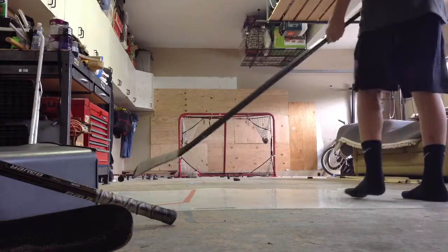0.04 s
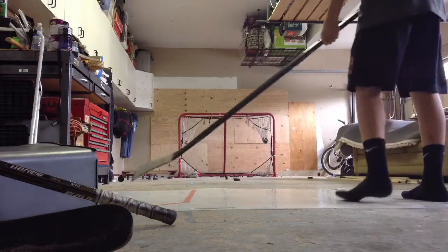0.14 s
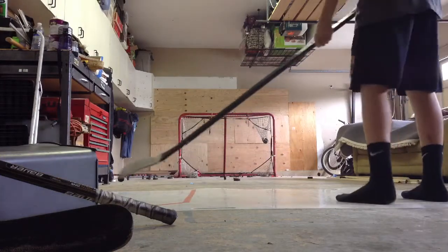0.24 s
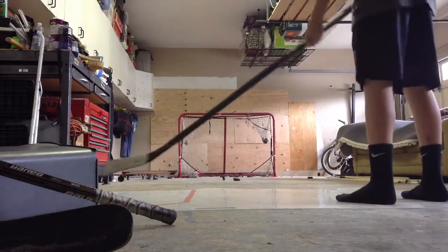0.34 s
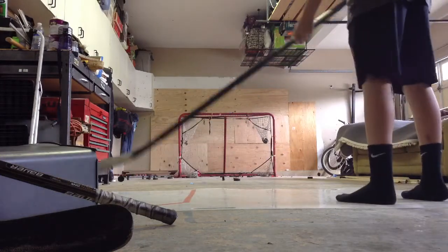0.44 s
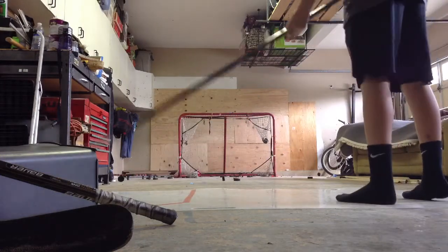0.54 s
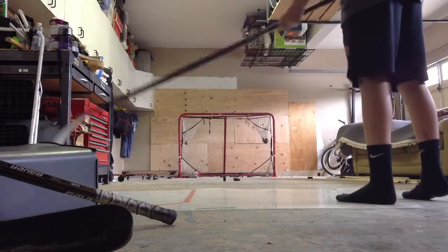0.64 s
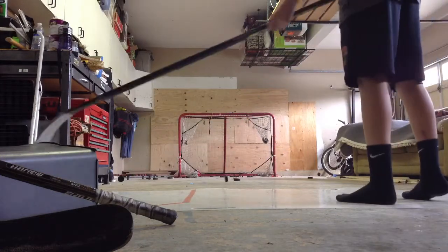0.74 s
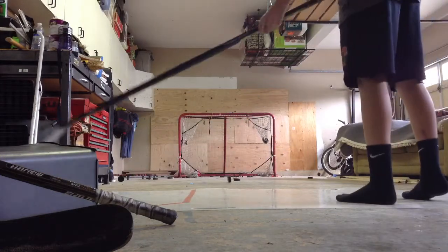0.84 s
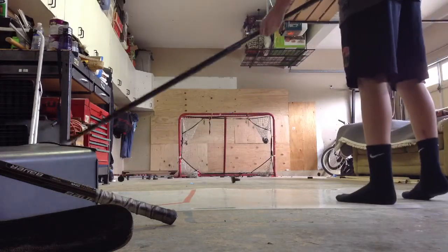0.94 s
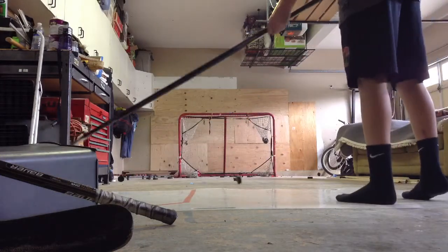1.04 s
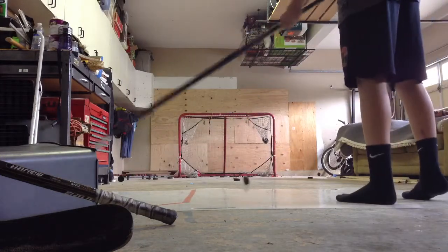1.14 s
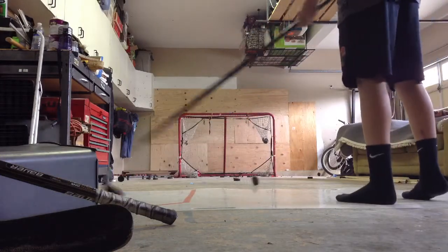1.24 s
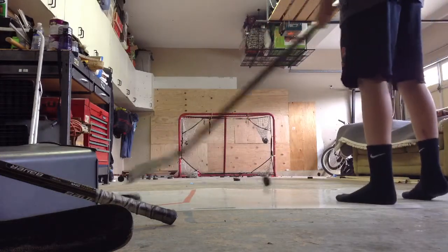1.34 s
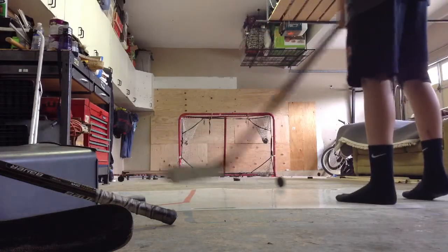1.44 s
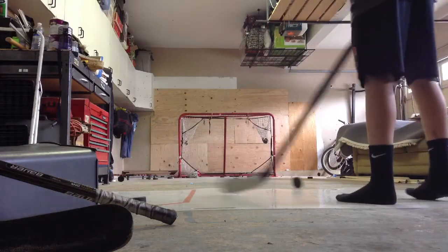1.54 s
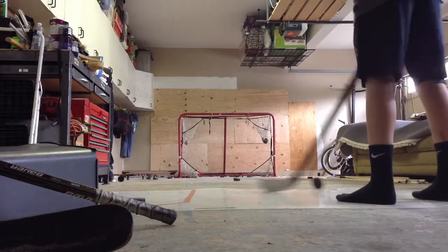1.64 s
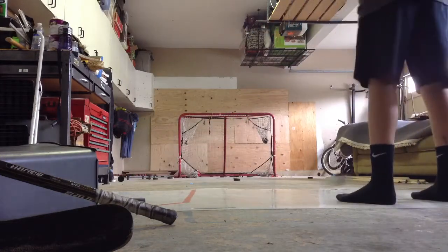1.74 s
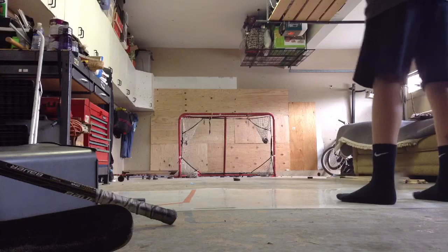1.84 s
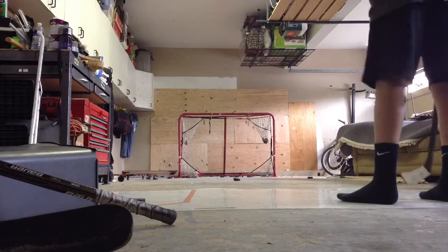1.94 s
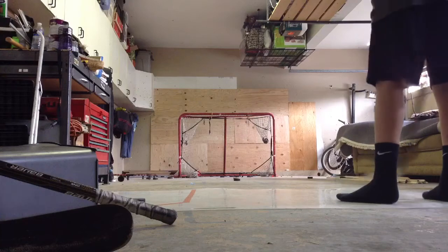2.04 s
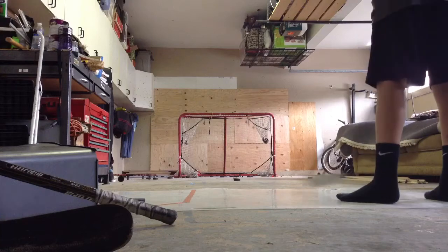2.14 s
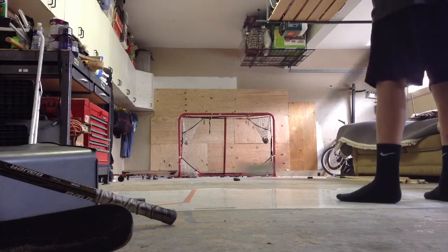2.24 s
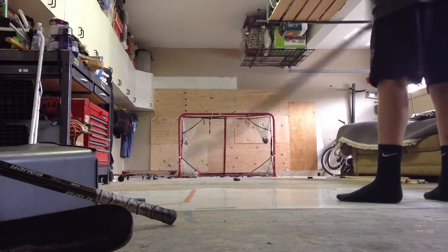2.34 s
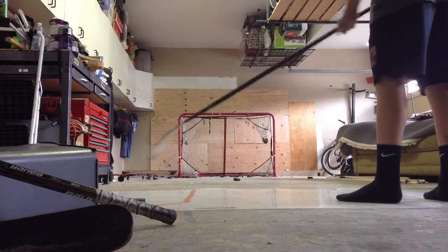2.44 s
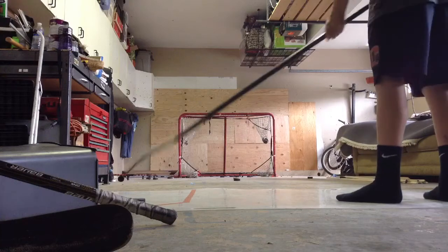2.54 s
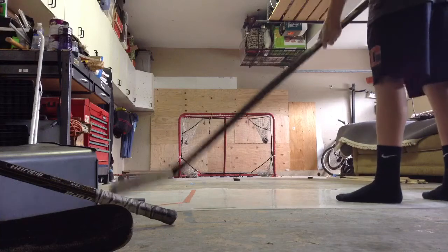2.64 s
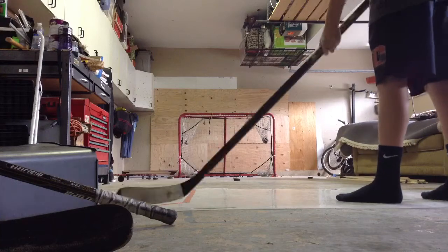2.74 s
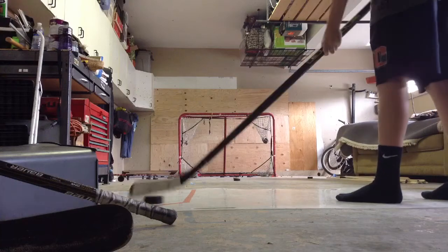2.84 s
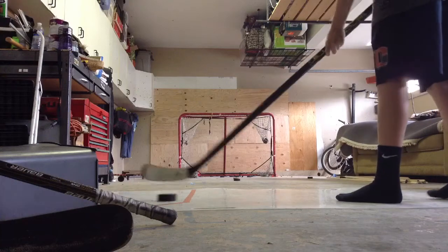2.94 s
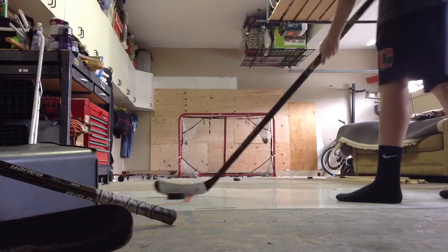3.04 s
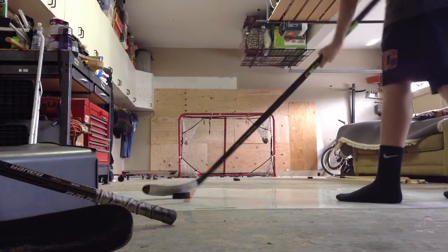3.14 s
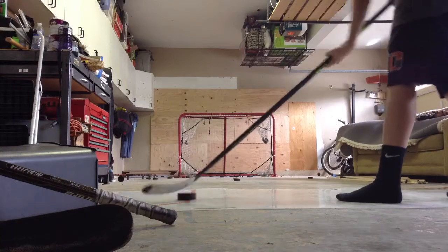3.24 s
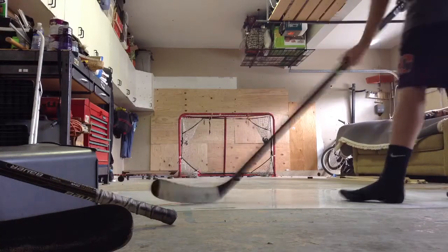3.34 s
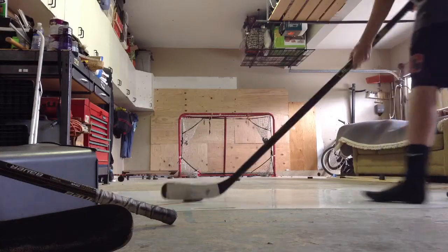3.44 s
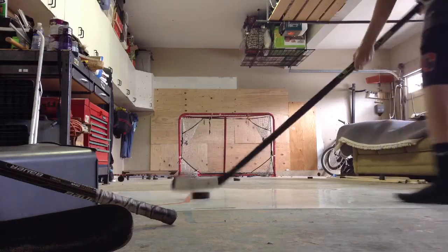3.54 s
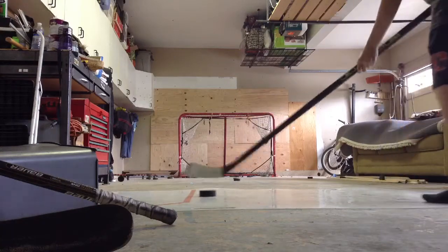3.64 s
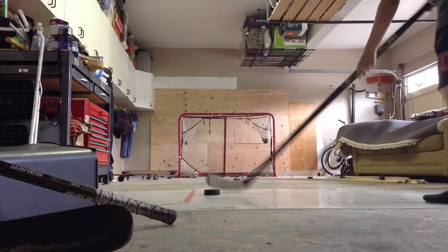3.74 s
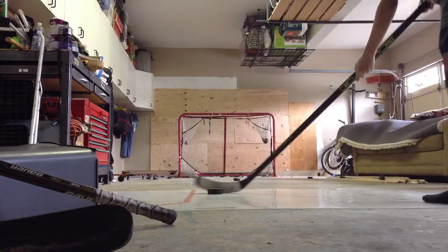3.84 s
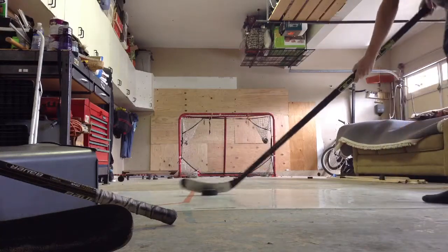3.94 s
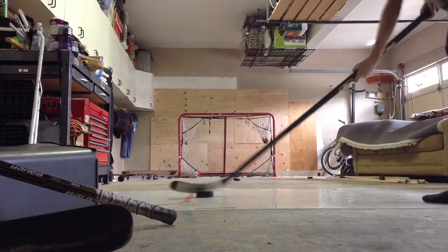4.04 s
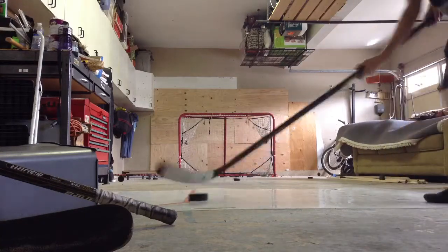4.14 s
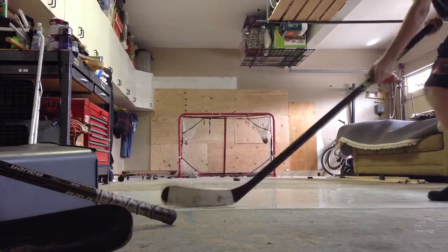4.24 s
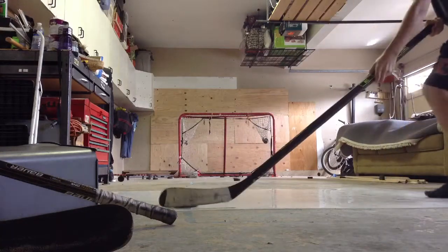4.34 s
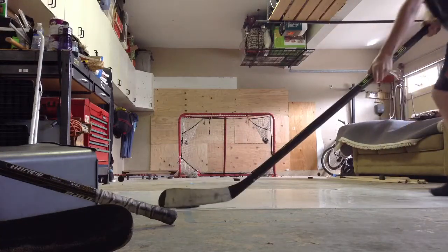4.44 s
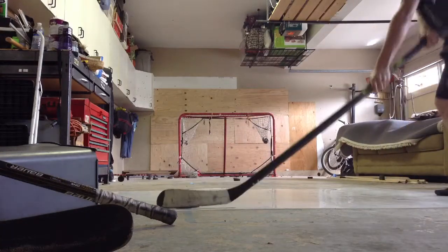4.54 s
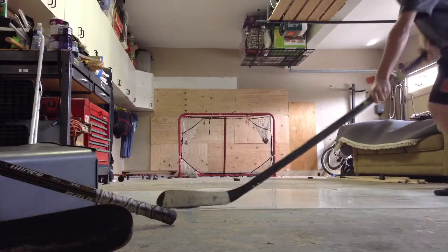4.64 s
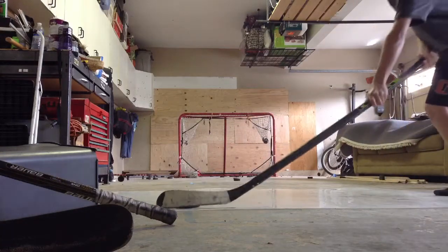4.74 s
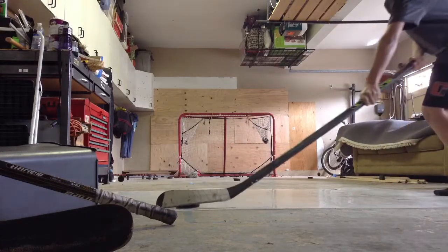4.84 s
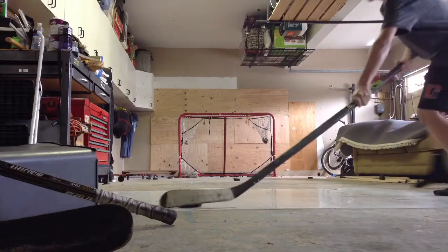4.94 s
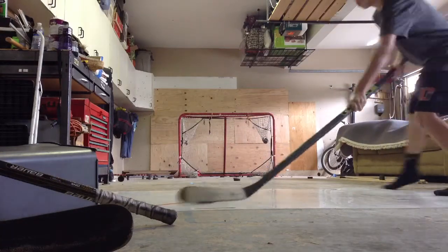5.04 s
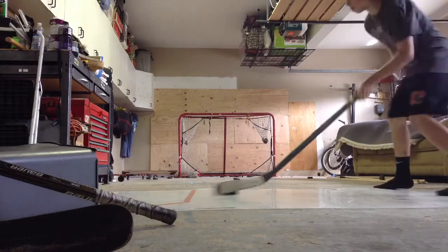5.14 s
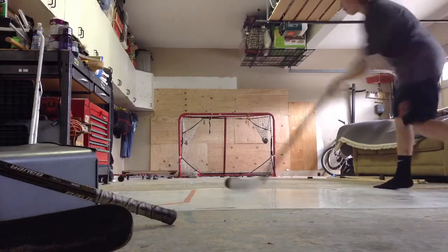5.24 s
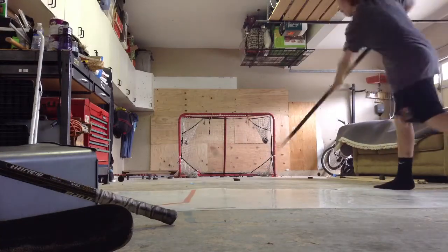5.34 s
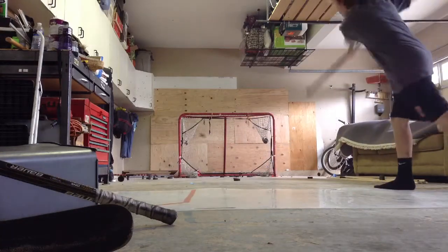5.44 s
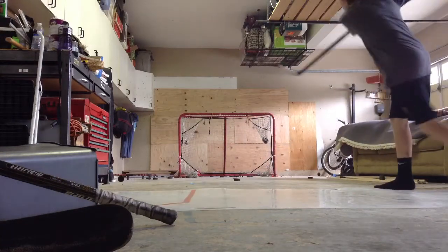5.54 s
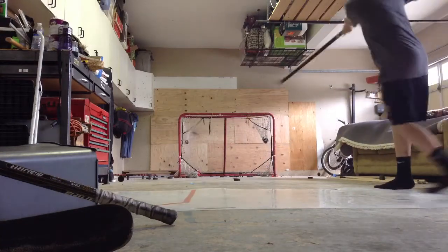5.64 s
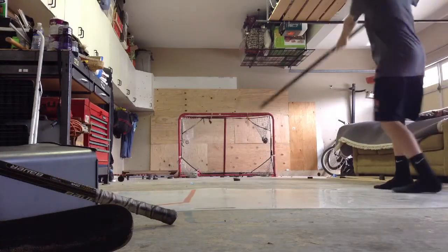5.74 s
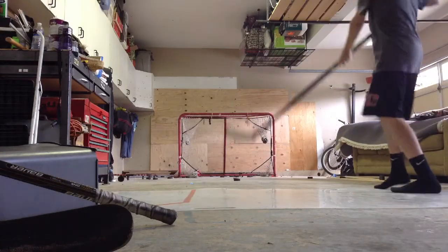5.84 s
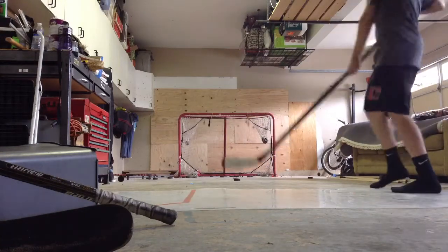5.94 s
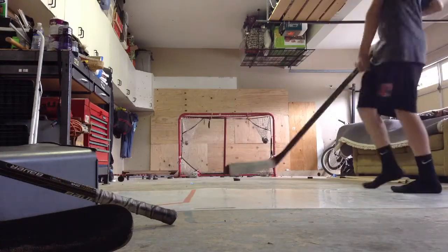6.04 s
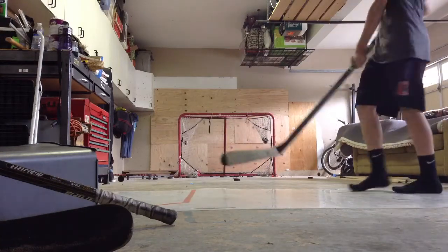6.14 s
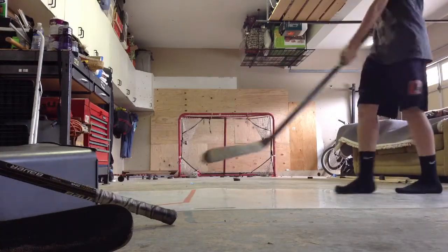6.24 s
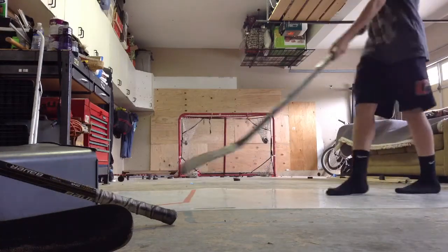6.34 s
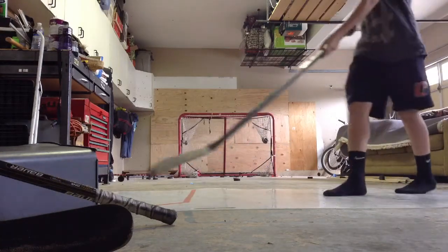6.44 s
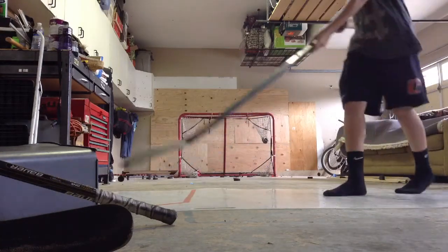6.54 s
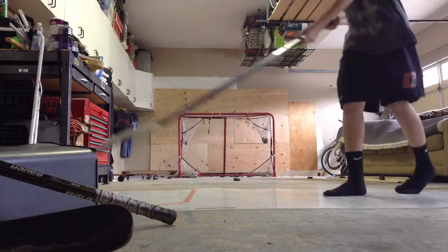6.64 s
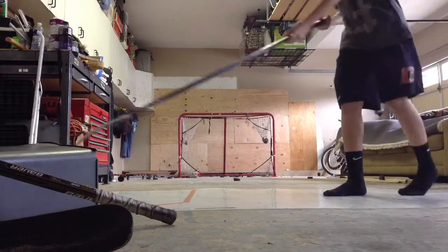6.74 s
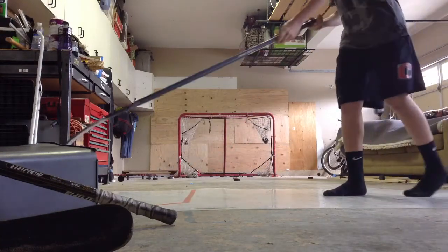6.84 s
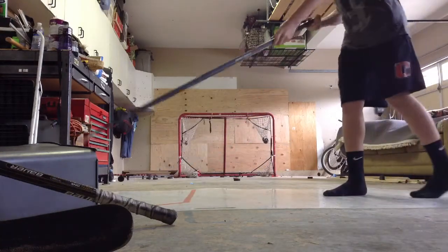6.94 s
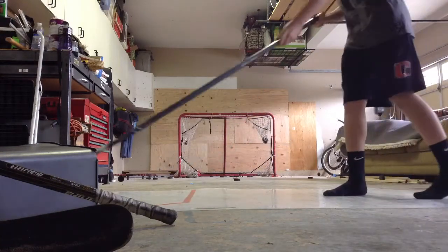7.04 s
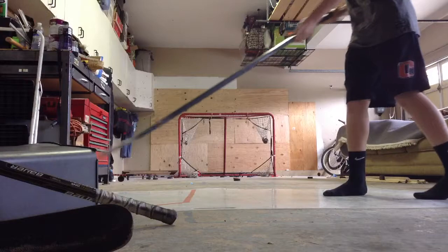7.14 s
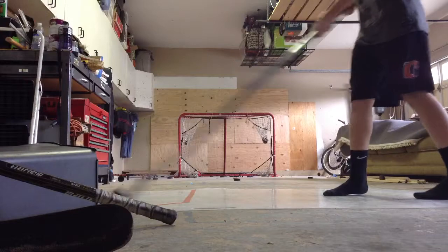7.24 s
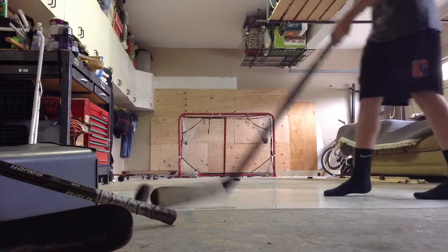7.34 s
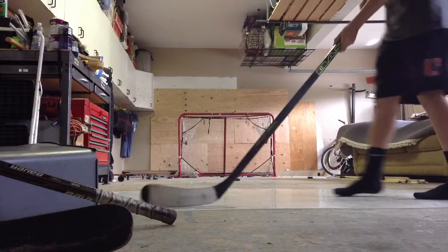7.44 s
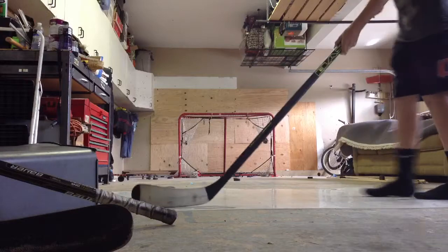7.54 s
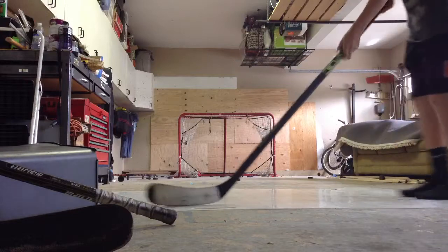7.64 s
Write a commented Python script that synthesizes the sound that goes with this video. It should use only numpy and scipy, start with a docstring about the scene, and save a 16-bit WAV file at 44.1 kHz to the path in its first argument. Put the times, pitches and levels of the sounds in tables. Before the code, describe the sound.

Hockey practice on a plastic pad indoors: light knocks and soft slides, a rapid run of clacks, a board knock and a slight steel ring. Heavy stick blows then come irregularly, slightly overloading the nearby bass-poor microphone, with scraping and floor slaps. After a pause comes a louder swish, a crackling flurry against hollow boards, a tiny tinkle, scattered taps and a last fast series, all in a lively garage with faint motor hum.

```python
"""Pucks and a stick blade on a plastic pad in a garage: faint knocks and slides, then quick clacks, a knock on
the plywood boards and a faint ring of the steel goal frame. The hardest blows follow, with scrapes and floor
thuds; then a louder slide, a dense flurry with hollow board knocks, a thin tinkle and a last run of clacks.
Each blow is a short push, the ring of the blade and a noisy crack; slides are shaped grit noise. The hard
room answers with echoes and a tail, over quiet air noise and a wavering motor hum."""
import sys
import numpy as np
from scipy import signal
from scipy.fft import rfft, irfft
from scipy.io import wavfile
from scipy.ndimage import uniform_filter1d

SR = 44100
rng = np.random.default_rng(int(sys.argv[2]) if len(sys.argv) > 2 else 0)


def ratio(d):
    """dB to gain"""
    e = np.asarray(d, float) / 20
    return 10 ** e


def file_out(sig):
    """Save sig as 16-bit WAV at sys.argv[1]."""
    # one column per channel
    cols = np.atleast_2d(sig).T
    # limit, then scale
    lim = np.clip(cols, -1, 1)
    pcm = np.round(lim * 32767).astype(np.int16)
    wavfile.write(sys.argv[1], SR, pcm)


N = 339570  # length of the scene in samples


def evened(x):
    """Scales a signal to rms 1."""
    return x / np.sqrt(np.mean(x ** 2) + 1e-20)


def read(points, hz):
    """Reads a curve of (hz, value) points along a logarithmic frequency axis."""
    point_hz, value = np.transpose(points)
    return np.interp(np.log(hz + 1), np.log(point_hz + 1), value)


def add(mix, s, sound):
    """Adds a sound to the mix in place from second s, cut at the end of the mix."""
    part = mix[round(s * SR):][:len(sound)]
    part += sound[:len(part)]


def coloured(x, spectrum):
    """Gives a long signal a spectrum of (hz, db) points, at rms 1."""
    gain = ratio(read(spectrum, np.fft.rfftfreq(len(x), 1 / SR)))
    return evened(irfft(rfft(x) * gain, len(x)))


def ring(t, hz, t60):
    """One dying mode: a sine that loses 60 dB in t60 seconds."""
    return np.sin(2 * np.pi * hz * t) * ratio(-60 * t / t60)


def blow(hz, crack_db, noise, detune):
    """Body (a one-cycle push and the blade's modes), crack of the edges, and its bright scatter."""
    # modes of stick blade and pad: mode_hz, width_hz, level_db
    blade_modes = [(434, 34, 0.5), (840, 150, -1.5), (1160, 350, 14), (1526, 28, 0), (2017, 47, 2),
                   (2330, 350, 13.5), (3050, 33, 1.5), (5100, 49, -14.5), (5800, 65, -27.5),
                   (7470, 84, -32)]
    t = np.arange(len(noise)) / SR

    late = np.maximum(t - .0011, 0)  # the body answers just after first contact
    push = ring(late, hz, 1.3 / hz) + 0.085 * ring(late, hz, 0.016)
    modes = np.zeros(len(t))
    for (mode_hz, width_hz, level_db), d in zip(blade_modes, detune):
        nearness_db = -7.0 * abs(np.log2(mode_hz / hz))  # the push excites modes near its own pitch
        t60 = min(1.53 / width_hz, .025)
        modes += ratio(level_db + nearness_db) * ring(late, mode_hz * (1 + 0.099 * d), t60)
    no_bass = signal.butter(3, 0.41 * hz, "high", fs=SR)  # a small body moves no air in the bass
    body = signal.lfilter(*no_bass, push + 0.19 * modes)
    top_hz = min(hz * (1.6 + 7.1 * ratio(crack_db)), 12000)  # a blow with less crack sounds duller
    body = signal.lfilter(*signal.butter(4, top_hz, fs=SR), body)

    contact = np.maximum(t - .0005, 0)
    burst = noise * (contact > 0) * ratio(-60 * contact / 0.016)
    crack = signal.lfilter(*signal.butter(1, [3200, 8000], "band", fs=SR), burst)

    click = (t == 0) + .03 * noise * ratio(-60 * t / .08)
    scatter = 3.86 * signal.lfilter(*signal.butter(1, [2700, 7800], "band", fs=SR), click)
    return body / abs(body).max(), crack / abs(crack).max(), scatter


def blows():
    """Direct sound of every blow of puck and blade, and their feeds to three room tails in turn."""
    # blows: contact_s, body_peak_db, push_pitch_hz, crack_db (hardness, against the body),
    # room_db (the body's feed to the room, against the direct body)
    blow_list = [(0.0764, -37, 1230, -9, -19), (0.1779, -42.5, 1740, -1, -5.5), (0.8661, -18, 930, -22, -8),
                 (0.901, -29, 920, -20, -15), (1.2544, -12, 1900, -6, 1), (1.2661, -11.5, 1900, -9, -11),
                 (1.285, -21, 2100, -19, -15), (1.311, -20, 2200, -4, -9), (1.3541, -10, 1660, -9.5, -4.5),
                 (1.369, -16.5, 2120, -14, -6), (1.5588, -22.5, 830, -5.5, -4.5),
                 (1.6529, -33.5, 1530, -5, 5), (1.7535, -9.5, 1200, -1, 4), (1.763, -3, 1250, -10.5, -2.5),
                 (2.3351, -30.5, 910, 2, 3.5), (2.585, -27.5, 493, -17.5, -7), (2.6708, -6, 1330, -2.5, -5),
                 (2.6831, -10, 1680, -12, -11.5), (3.0269, -3, 1240, -11.5, -6),
                 (3.106, -3.5, 950, -12.5, -10), (3.3276, -2.5, 1060, -7.5, -3),
                 (3.4269, -0.5, 840, -26, -13.5), (3.4696, -9.5, 1020, -15.5, -4.5),
                 (3.749, -7, 1600, -7.5, 0.5), (3.761, -1.5, 1720, -17, -27), (3.8561, 0, 864, -36, -9.5),
                 (4.1856, 2.5, 1466, -14, -6), (4.2812, -2.5, 1020, -26, -14.5), (5.067, -29, 2170, 7, -22),
                 (5.1451, -17, 750, -7, -2), (5.1554, -13.5, 826, -12.5, -26.5),
                 (5.1943, -12.5, 940, 5.5, 8.5), (5.2082, -20.5, 1160, 8, 8), (5.222, -13, 990, 5, -3),
                 (5.232, -5.5, 1090, -12, 2), (5.2515, -10, 1050, 5, 2), (5.6427, -18.5, 800, -7.5, 2),
                 (5.686, -14.5, 875, -9.5, -2.5), (5.8342, -16, 670, -5.5, 2),
                 (5.842, -14.5, 910, -3, -1.5), (6.0891, -11, 1070, -5.5, 3),
                 (6.094, -16.5, 1120, 3.5, 1.5), (6.5911, -45.5, 650, -7, 3),
                 (6.9206, -30, 696, -15.5, -0.5), (6.9441, -32, 750, -7, -15), (7.0306, -36, 655, -6.5, -2),
                 (7.1459, -12.5, 1800, -9, -0.5), (7.1586, -12, 1640, -11, -30),
                 (7.1933, -8.5, 1130, -7, -3.5), (7.209, -11, 1150, -14, -4),
                 (7.255, -11.5, 1410, -1.5, -4.5), (7.269, -17, 2200, -18, -2), (7.286, -21, 2300, -25, -8),
                 (7.4748, -14.5, 600, -20, -11.5), (7.5192, -32, 764, -31.5, -30),
                 (7.5658, -15, 1260, -3, -3.5), (7.646, -18, 2600, -17, -6)]
    scatter_db = -2  # a harder blow throws more brightness at the walls: its scatter follows its crack
    near, feeds = np.zeros(N), np.zeros((3, N))
    noise = rng.standard_normal((len(blow_list), 3000))
    detune = rng.standard_normal((len(blow_list), 40))
    for k, (s, db, hz, crack_db, room_db) in enumerate(blow_list):
        body, crack, scatter = blow(hz, crack_db, noise[k], detune[k])
        add(near, s, ratio(db) * (body + ratio(crack_db) * crack))
        to_room = ratio(room_db) * body + ratio(crack_db + scatter_db) * scatter
        add(feeds[k % 3], s, ratio(db) * to_room)
    return near, feeds


def thuds():
    """The pad slaps the floor: low tones that die within a few cycles, direct and as room feeds."""
    # slaps: contact_s, level_db, pitch_hz
    slap_list = [(0.866, -28, 330), (1.253, -25, 333), (2.586, -26, 316), (2.67, -28.5, 323),
                 (3.026, -21, 417), (3.107, -20.5, 304), (3.332, -22, 297), (3.428, -24, 356),
                 (3.622, -21, 400), (3.644, -20.5, 220), (3.663, -25.5, 253), (3.69, -28.5, 234),
                 (3.856, -23, 420), (4.186, -19.5, 387), (4.282, -23, 327), (5.645, -18, 331),
                 (5.833, -18, 430), (6.089, -17.5, 375), (6.592, -43, 382), (6.921, -30, 342),
                 (7.143, -22, 423), (7.473, -47, 415), (7.567, -22.5, 338)]
    near, feeds = np.zeros(N), np.zeros((3, N))
    t = np.arange(3000) / SR
    for k, (s, db, hz) in enumerate(slap_list):
        thud = ratio(db) * ring(t, hz, 7 / hz)
        add(near, s + 0.0022, thud)  # the direct thud comes just after contact
        add(feeds[k % 3], s, ratio(-6.0) * thud)
    return near, feeds


def slides():
    """Dense grit under puck and blade: a bright fizz and a duller rub swell and fade with each stroke."""
    # strokes over the pad: fastest_s, rise_s, fall_s, level_db, rub_db (against the stroke's level)
    strokes = [(0.18, 0.079, 0.046, -55, -13), (0.45, 0.15, 0.16, -70.5, -1), (1.12, 0.29, 0.13, -61.5, -2),
               (1.35, 0.077, 0.19, -48, 4), (1.6, 0.046, 0.12, -46, -12), (1.9, 0.26, 0.37, -55.5, -5),
               (2.2, 0.22, 0.31, -62, -15), (2.43, 0.16, 0.22, -54.5, -0.5), (2.85, 0.21, .4, -44, -2),
               (3.099, 0.18, 0.23, -44, 3), (3.42, 0.12, .15, -44, -15.5), (3.6, 0.26, 0.35, -43.5, -7.5),
               (3.98, 0.22, 0.28, -40, -13), (4.26, 0.11, 0.17, -44.5, 5), (4.52, 0.33, 0.19, -57.5, -17),
               (5.08, .2, 0.32, -36.5, -6), (5.502, .05, .1, -52.5, 5.5), (5.64, .1, 0.2, -39.5, -3),
               (5.9, .15, 0.14, -46.5, 2.5), (6.15, 0.14, 0.31, -44.5, -9), (6.78, 0.27, .35, -52.5, -12),
               (7.3, 0.14, 0.23, -49.5, -9.5), (7.56, 0.072, 1, -52, 5.5)]
    # spectrum of the bright fizz: freq_hz, density_db (per Hz, relative)
    fizz_spectrum = [(1470, -60), (2500, -2.5), (2930, -13), (3550, -2), (7710, -4.5), (8700, -5),
                     (13500, -1.5), (15400, -1)]
    # spectrum of the duller rub: freq_hz, density_db (per Hz, relative)
    rub_spectrum = [(88, -74), (150, -33), (271, -1.5), (584, -6), (895, -3.5), (1410, -0.5), (2100, 2.5),
                    (4000, -2), (5200, -15.5), (8800, -120)]
    ends_db = -20  # drop at one rise before and one fall after the fastest moment

    t = np.arange(0, N + 64, 64) / SR  # coarse time grid for the levels
    s, rise, fall, db, rub_db = np.transpose(strokes)[:, :, None]
    arch = ratio(db + ends_db * ((t - s) / np.where(t < s, rise, fall)) ** 2)

    def level(gains):
        """Sums the strokes by power and draws the level out to every sample."""
        return np.interp(np.arange(N) / SR, t, np.sqrt((gains ** 2).sum(0)))

    grit = rng.standard_normal((2, N)) * ratio(1.1 * rng.exponential(1, (2, N)))
    catches = ratio(1.2 * evened(uniform_filter1d(rng.standard_normal(N), 900)))  # uneven grip, in dB
    fizz = level(arch) * ratio(3.0) * coloured(grit[0], fizz_spectrum)
    rub = level(arch * ratio(rub_db)) * coloured(grit[1], rub_spectrum)
    return catches * (fizz + rub)


def boards():
    """Hollow knock of the plywood; each hit lands on another spot and stirs the modes unevenly."""
    # modes of the plywood behind the net: mode_hz, level_db, t60_s (cut short below)
    wood_modes = [(415, -31.5, 0.29), (597.4, -3, 0.13), (670, -8, 0.45), (736, -6.5, 0.73),
                  (840, -13, 0.61), (950, -31, 1.2), (996, -16, 0.39)]
    # hits on the plywood: start_s, level_db
    wood_hits = [(.867, -42), (1.763, -17.5), (5.146, -33.5), (5.196, -16), (5.228, -19.5), (5.252, -22.5),
                 (5.644, -31.5), (6.092, -32.5), (7.476, -30)]
    t, out = np.arange(SR // 4) / SR, np.zeros(N)
    spots = rng.standard_normal((len(wood_hits), len(wood_modes)))
    for (s, hit_db), spot in zip(wood_hits, spots):
        knock = np.zeros(len(t))
        for (hz, db, t60), d in zip(wood_modes, spot):
            knock += ratio(db + 5.6 * d) * ring(t, hz, min(t60, .09))
        add(out, s, ratio(hit_db) * knock)
    return out


def goal_frame():
    """A puck touches the steel pipe, whose modes ring."""
    # modes of the steel goal frame: mode_hz, level_db, t60_s
    pipe_modes = [(478, -4.5, 0.15), (969, -6, 0.24), (998, -11.5, 0.46), (1080, -5.5, 0.13),
                  (1722, -11, 0.15), (2800, -16, 0.22)]
    # touches of the pipe: start_s, level_db
    pipe_hits = [(2.339, -33)]
    t, out = np.arange(SR // 2) / SR, np.zeros(N)
    for s, hit_db in pipe_hits:
        add(out, s, ratio(hit_db) * sum(ratio(db) * ring(t, hz, t60) for hz, db, t60 in pipe_modes))
    return out


def tinkle():
    """Something small tinkles: thin brief tones with a soft onset."""
    # tones: start_s, pitch_hz, level_db, t60_s
    tones = [(5.701, 5370, -47, .4), (5.73, 10050, -37, 0.15)]
    t, out = np.arange(SR // 2) / SR, np.zeros(N)
    for s, hz, db, t60 in tones:
        add(out, s, ratio(db) * ring(t, hz, t60) * (1 - np.exp(-t / 0.011)))
    return out


def garage(feeds):
    """A few early echoes, then sparse taps whose bands die at their own speed."""
    # decay of the garage: freq_hz, t60_s
    decay = [(150, 0.47), (400, 0.66), (1000, 0.62), (2800, 0.75), (7000, 0.73), (14000, 0.23)]
    # early echoes from floor, shelves, ceiling: delay_s (before a small random shift), level_db
    early = [(.0045, -4), (0.01, -7), (0.0149, -6), (.023, -23), (0.03, -19.5)]
    t = np.arange(SR) / SR

    taps = np.zeros((3, SR))
    slots = np.arange(300, SR - 12, 12)  # one tap of random sign in every 12 samples
    at = slots + rng.integers(0, 12, (3, len(slots)))
    np.put_along_axis(taps, at, rng.choice([-1., 1.], at.shape), 1)
    taps *= 1 - np.exp(-t / 0.0034)  # the tail builds up
    # shelves and walls return clusters, which even out later in the tail
    lumps = evened(uniform_filter1d(rng.standard_normal((3, SR)), 260, axis=1))
    taps *= ratio(3.15 * lumps * np.exp(-t / 0.098))

    hz, frame_s, z = signal.stft(taps, SR, nperseg=256)
    fade = ratio(-60 * frame_s / read(decay, hz)[:, None])
    tails = signal.istft(z * fade, SR, nperseg=256)[1]
    tails *= ratio(7.5) / np.linalg.norm(tails, axis=1, keepdims=True)

    shift = rng.uniform(-1, 1, (3, len(early)))  # ms
    for tail, row in zip(tails, shift):
        for (s, db), d in zip(early, row):
            tail[round((s + .001 * d) * SR)] += ratio(db)
    return signal.oaconvolve(feeds, tails, axes=1)[:, :N].sum(0)


def room_tone():
    """Quiet air noise and a wavering motor hum; both follow one slow level curve, the air more weakly."""
    # motor tones: pitch_hz, level_db (relative between tones)
    motor_tones = [(129.2, -52.5), (242.2, -77.5), (360.7, -79), (597.5, -80), (1561, -96.5), (1798, -79)]
    # slow level of the hum: time_s, gain_db
    hum_gain = [(0, -0.5), (1.2, -4.5), (2, -3.5), (3, -7.5), (4.8, -12), (6.7, -10), (7.7, -8)]
    # spectrum of the air noise: freq_hz, density_db (per Hz, relative)
    air_spectrum = [(60, -63), (110, -1.5), (170, -4.5), (250, -0.5), (400, -10), (700, -12), (1400, -20.5),
                    (3000, -24), (8000, -26), (15400, -29)]
    t = np.arange(N) / SR
    drift = evened(uniform_filter1d(rng.standard_normal((len(motor_tones), N)), 9000, axis=1))
    hum = np.zeros(N)
    for (hz, db), d in zip(motor_tones, drift):
        hum += ratio(db + 4 + 1.6 * d) * np.sin(2 * np.pi * hz * t)
    air = ratio(-61.5) * coloured(rng.standard_normal(N), air_spectrum)
    level_db = np.interp(t, *np.transpose(hum_gain))
    return hum * ratio(level_db) + air * ratio(0.34 * level_db)


def scene():
    """Sums the direct sounds, the garage's answer to them and the room tone."""
    near, feeds = blows()
    slaps, slap_feeds = thuds()
    sliding, wood = slides(), boards()
    metal = goal_frame() + tinkle()
    feeds += slap_feeds
    feeds[0] += ratio(-2.5) * metal + ratio(-16.0) * sliding
    feeds[1] += ratio(-5) * wood
    direct = near + slaps + sliding + wood + metal
    return (direct + garage(feeds) + room_tone())[None]


def low_pass(x):
    """Removes everything above the highest recorded frequency."""
    return signal.sosfilt(signal.butter(12, 16630, fs=SR, output="sos"), x)


def record(dry):
    """A small microphone loses the bass; loud peaks overload the input; then the band limit."""
    bass_cut = signal.butter(4, 190, "high", fs=SR, output="sos")
    thin = signal.sosfilt(bass_cut, dry)
    ceiling = .73  # overloaded peaks bend smoothly towards this
    bent = thin / (1 + abs(thin / ceiling) ** 6) ** (1 / 6)
    band_limit = signal.firwin(401, 15450, fs=SR)[None]
    mix = signal.oaconvolve(bent, band_limit, "same")
    return low_pass(mix)


dry = scene()
out = record(dry)
file_out(out)
```